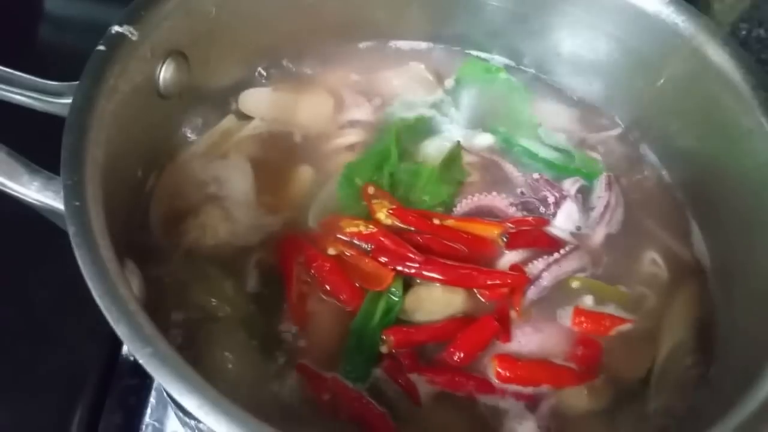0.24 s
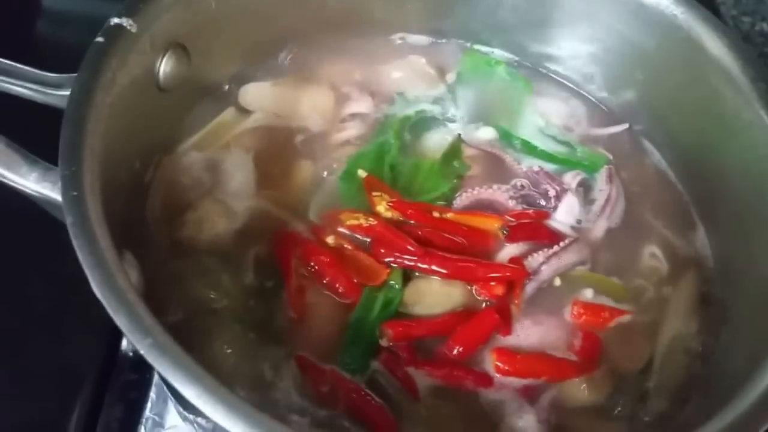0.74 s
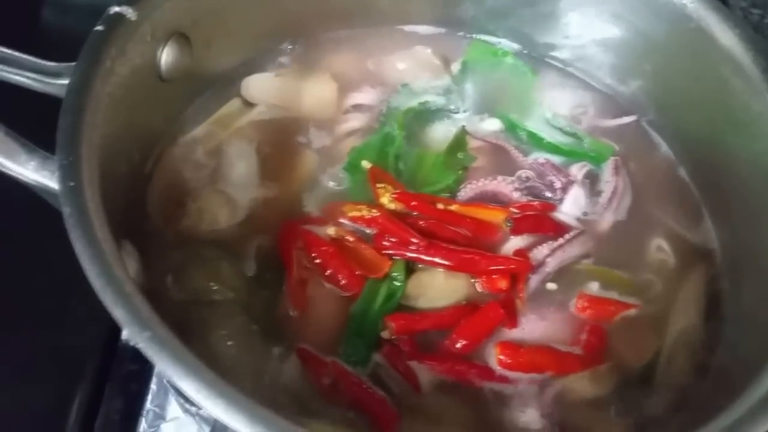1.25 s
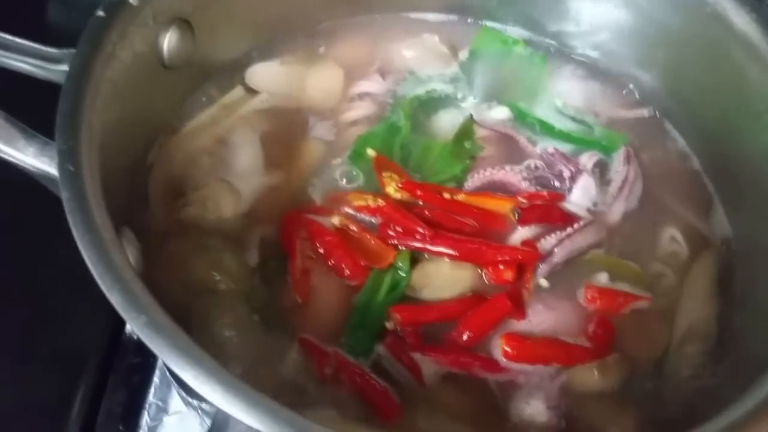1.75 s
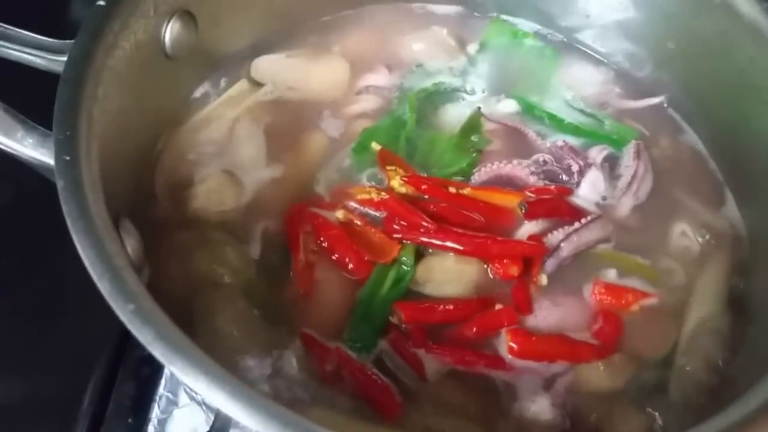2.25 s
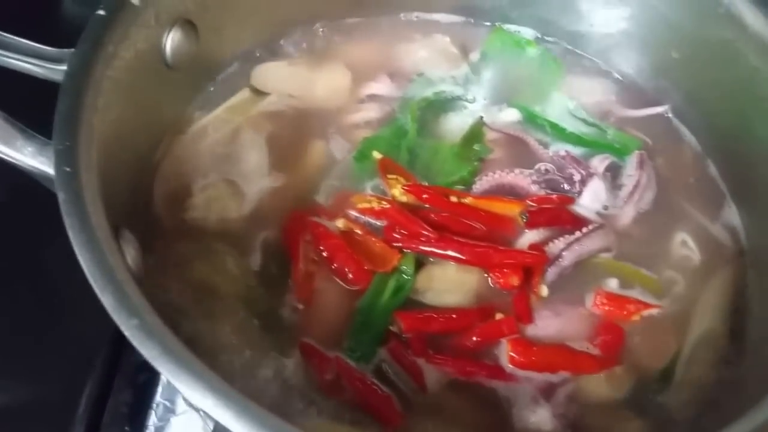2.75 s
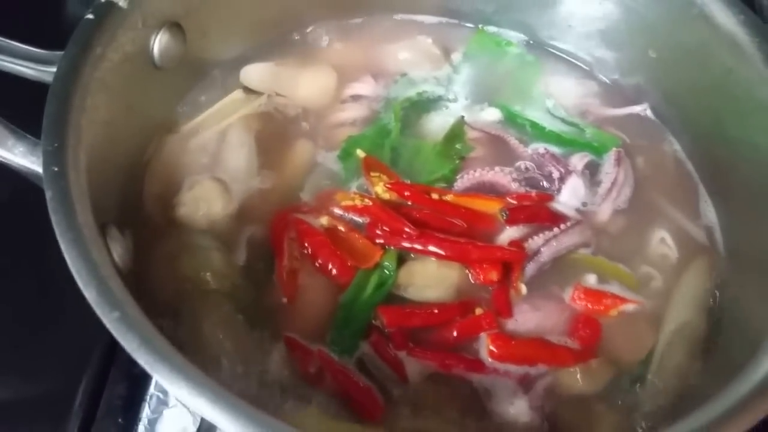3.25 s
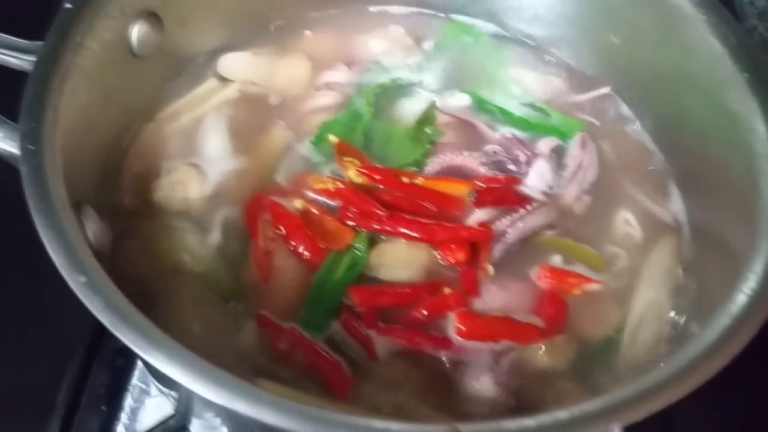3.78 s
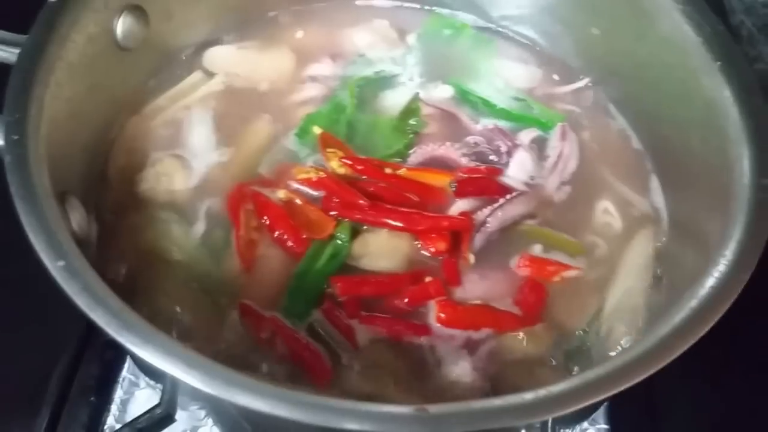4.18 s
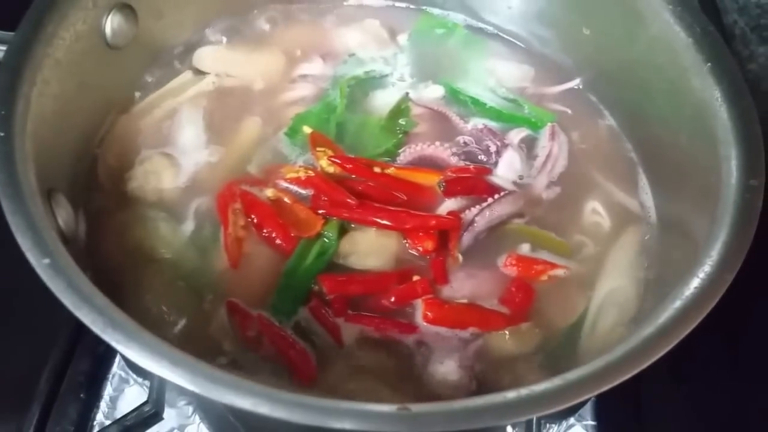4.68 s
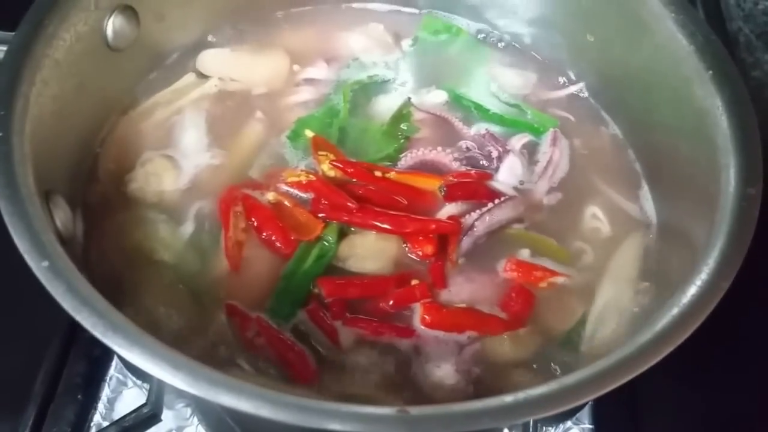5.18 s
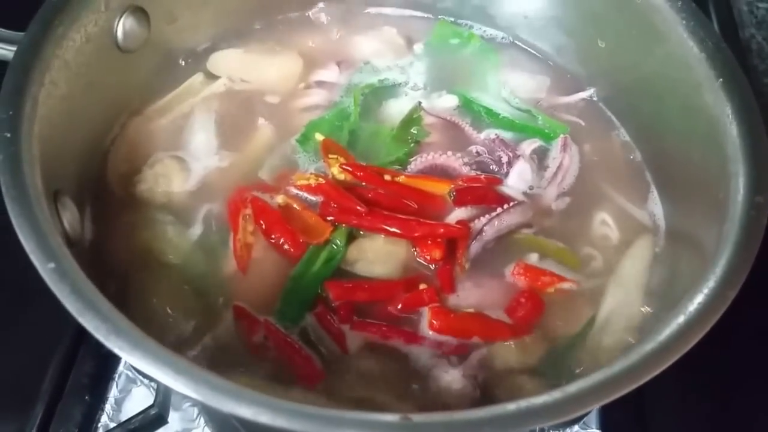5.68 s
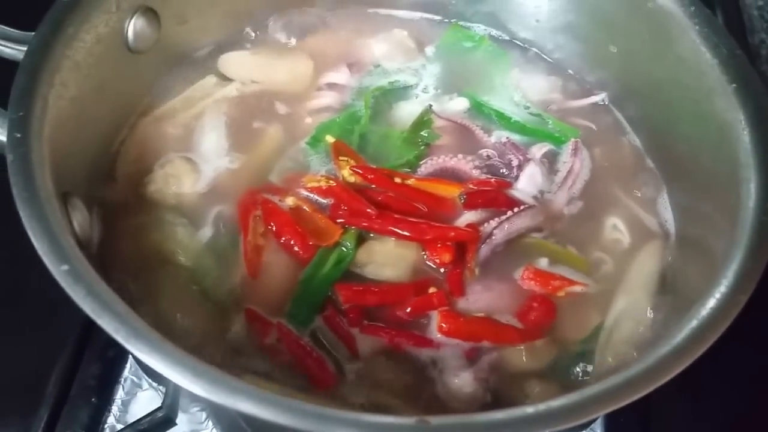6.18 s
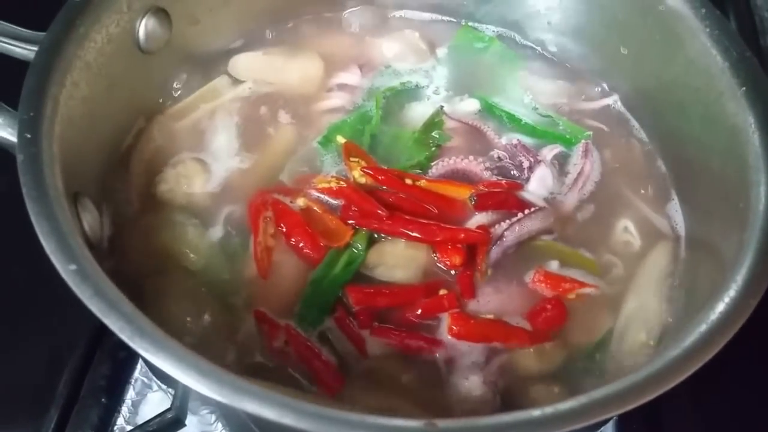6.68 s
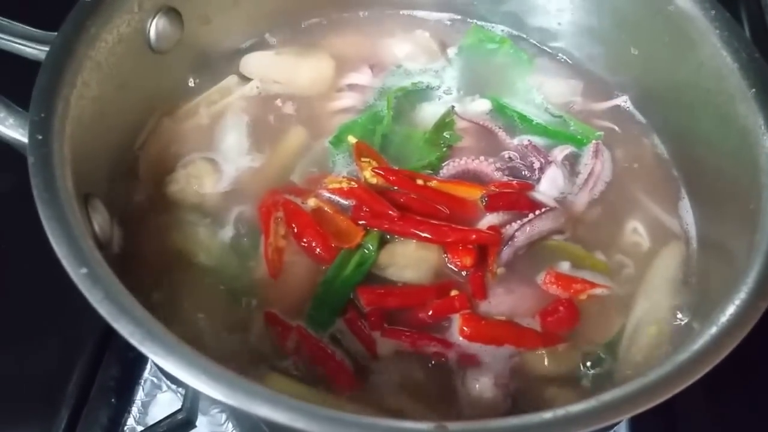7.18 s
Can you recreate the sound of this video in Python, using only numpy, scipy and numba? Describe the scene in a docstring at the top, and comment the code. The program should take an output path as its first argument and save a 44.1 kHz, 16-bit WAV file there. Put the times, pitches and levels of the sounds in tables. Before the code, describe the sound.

A steel pot of broth boils close to a phone, stronger on the left. From 0 to 0.75 s it is fiercest: wet, hollow bubble pops with snapping films, and a flickering hiss swelling near 0.4 s. Tiny tinks come around 0.85 s, then light metal rattles from 0.9 to 1.2 s. The boil thins to scattered plops, crisp spits and low gurgling, with the pot's air ringing. At 2.34 s a cupboard knock booms and overloads the microphone; lesser thumps follow around 2.6 s. At 3.28 s something clacks once, hard and bright, with a short echo. Bubbling continues, with very faint bumps near 3.5, 5.35 and 6.04 s and a short sizzle around 5.3 s. At 6.55 s a moderate knock carries small high rings. Low motor hum beats slowly under soft flame rush throughout, in a small kitchen, until 7.4 s.

```python
"""Boiling broth in a steel pot: bubbles burst as short damped rings and set the air in the pot ringing, and spray
fizzes on the hot wall as flickering noise. A cupboard nearby is knocked a few times and something else clacks
once (ringing modes, bright cracks, clear short rings); something light rattles once (narrow noise and rings).
Behind it two motors hum and beat over a rush of flame and kitchen. A phone is held over the pot, its left
microphone nearer, and the loudest knocks overload it."""
import sys
import numpy as np
from scipy import signal
from scipy.fft import rfft, irfft, next_fast_len
from scipy.io import wavfile
from scipy.ndimage import uniform_filter1d
from numba import njit

SR = 44100
rng = np.random.default_rng(int(sys.argv[2]) if len(sys.argv) > 2 else 0)


def linear_from_db(decibels):
    """Turn decibels (scalar or array-like) into linear amplitude factors; 0 gives 1."""
    return 10 ** (np.asarray(decibels, float) / 20)


def wav_record(signal):
    """Record a signal, one row per channel, as 16-bit PCM in the file named by sys.argv[1]."""
    frames = np.transpose(np.atleast_2d(signal))
    bounded = np.clip(frames, -1, 1)
    # unit amplitude maps onto the largest positive 16-bit level
    quanta = np.round(bounded * 32767).astype(np.int16)
    wavfile.write(sys.argv[1], SR, quanta)


N = 327649
T = np.arange(N) / SR


def along(table, hz):
    """Reads (pitch [Hz], value) rows at any pitch, on a log-frequency axis."""
    rows = np.array(table, float)
    return np.interp(np.log(np.maximum(hz, 1)), np.log(rows[:, 0]), rows[:, 1])


def colour(x, table, share=1):
    """Filters by (pitch [Hz], level [dB]) rows, the levels scaled by share."""
    n = next_fast_len(x.shape[-1], True)
    gain = linear_from_db(share * along(table, np.fft.rfftfreq(n, 1 / SR)))
    return irfft(rfft(x, n) * gain, n)[..., :x.shape[-1]]


def band(x, lo_hz, hi_hz):
    """Keeps the pitches between two limits, using only past sound."""
    sos = signal.butter(2, [lo_hz, min(hi_hz, SR / 2.2)], "band", fs=SR, output="sos")
    return signal.sosfilt(sos, x)


def unit(x):
    """Scales a sound to rms 1."""
    return x / np.sqrt(np.mean(x ** 2))


def pair(size, apart_hz=700):
    """Two noises, left and right, alike in the bass and unrelated in the treble."""
    n = next_fast_len(size, True)
    mid, side = rfft(rng.standard_normal((2, n)))
    alike = 1 / (1 + (np.fft.rfftfreq(n, 1 / SR) / apart_hz) ** 2)
    shared = mid * np.sqrt(1 + alike)
    opposed = np.outer([1, -1], side * np.sqrt(1 - alike))
    return irfft(shared + opposed, n)[:, :size] / 2 ** .5


def walk(rate):
    """Smooth random wandering of rms 1, from about rate new values a second."""
    k = int(SR / rate)
    steps = np.repeat(rng.standard_normal(N // k + 1), k)
    return unit(uniform_filter1d(uniform_filter1d(steps, k), k)[:N])


def add(out, s, x):
    """Mixes x into out from time s [s]."""
    i = int(s * SR)
    out[..., i:i + x.shape[-1]] += x[..., :N - i]


def fall(t60, size=SR // 2):
    """Exponential decay that drops 60 dB in t60 [s]."""
    return np.exp(-np.log(1000) * T[:size] / t60)


@njit
def grains(s, hz, cycles, left, right, glide, n, sr):
    """Short damped rings whose pitch climbs as the cavity closes."""
    out = np.zeros((2, n))
    for k in range(len(s)):
        span, phase = cycles[k] * sr / hz[k], 0.
        for j in range(min(int(4 * span), n - int(s[k] * sr))):
            u = j / span
            phase += 2 * np.pi * hz[k] * (1 + glide * u) / sr
            v = np.sin(phase) * 5.4 * u * np.exp(-2 * u)
            out[0, int(s[k] * sr) + j] += left[k] * v
            out[1, int(s[k] * sr) + j] += right[k] * v
    return out


def in_pot(x, ring_db=-6):
    """The air column over the broth rings on after each burst."""
    # resonances of the air in the pot: (pitch [Hz], width [Hz], level against the others [dB])
    air_rings = [(790, 110, 1), (1635, 242, -4), (2730, 53, 2), (3224, 96, -1), (4140, 130, -2)]
    top = max(db for _, _, db in air_rings)
    rings = (linear_from_db(db - top) * band(x, hz - width / 2, hz + width / 2) for hz, width, db in air_rings)
    return x + linear_from_db(ring_db) * sum(rings)


def bubbles(churn_db, count=3500, spread_db=2.6):
    """Small bubbles ring at random; the listed loud ones also snap their film and splash back in four drops."""
    # loudest bursting bubbles, before the offsets below:
    # (time [s], level [dB], starting pitch [Hz], film snap level [dB], left minus right [dB])
    pops = [(0.008, -27, 760, -35, 13), (0.022, -11, 2030, -18.5, 15.5), (0.024, -26, 1980, -12.5, 7.5),
            (0.063, -24, 4300, -35, 24), (0.151, -30, 840, -50, 9), (0.16, -22, 965, -53, 13),
            (0.178, -24, 1940, -37, 18), (0.269, -15, 2170, -19.5, 8), (0.426, -19.5, 2440, -37, 7),
            (0.474, -20.5, 790, -34, 11), (0.503, -11.5, 1790, -9, 8), (0.599, -35.5, 1620, -59, 39),
            (0.603, -23.5, 880, -57, 4), (0.613, -26, 850, -56, 9), (0.624, -25, 4140, -37, 31.5),
            (0.731, -28.5, 680, -41, 10), (0.743, -30.5, 794, -40, 11), (0.929, -24.5, 1580, -44, 1),
            (1.302, -30.5, 1095, -53, 7), (1.384, -31.5, 1560, -49, 26), (1.487, -39, 3720, -60, 32),
            (1.513, -26, 1740, -51, 1), (1.548, -21.5, 990, -43, 11), (1.632, -23.5, 1710, -54, -2),
            (1.881, -24.5, 1680, -65, -1), (1.944, -35.5, 2510, -53, 16), (2.035, -31, 790, -93, 8),
            (2.172, -25, 765, -49, 7), (2.213, -33.5, 1630, -63, 0), (2.799, -23, 1710, -72, 0),
            (3.715, -27, 1120, -60, 4), (3.757, -30.5, 880, -44, 8), (4.229, -32.5, 870, -44, 15),
            (5.212, -27.5, 990, -55, 11), (5.223, -18.5, 1640, -56, -1), (5.738, -28, 2280, -58, 18),
            (5.936, -24.5, 790, -47, 12), (6.199, -32.5, 1050, -52, 15), (6.227, -29, 1690, -53, 4),
            (6.799, -32, 1680, -65, 0), (7.308, -33.5, 1070, -46, 10)]
    pot_left_db = 7  # taken off left minus right, as the microphones favour the left too
    chance = rng.random((count, 5)).T
    s = chance[0] * (N - 1) / SR
    size = linear_from_db(churn_db[(s * SR).astype(int)] - 8 - spread_db * np.log(1 - chance[1]))
    pan = linear_from_db(10.6 * (chance[4] - .5))
    hz, cycles = 450 * 8.4 ** chance[2], 0.11 + 1.93 * chance[3]
    small = grains(s, hz, cycles, size * pan, size / pan, 0.055, N, 1. * SR)

    s, db, hz, snap_db, pan_db = np.array(pops, float).T
    side = linear_from_db((pan_db - pot_left_db) / 2)
    loud = grains(s - .0007, hz, 2.12 + 0 * s, linear_from_db(db) * side, linear_from_db(db) / side, 0.023, N, 1. * SR)

    later, pitch, share = rng.random((len(s), 4, 3)).T
    drop = (linear_from_db(db + 2) * share).ravel()
    drop_s = (s + 0.0094 * later ** 2).ravel()
    drop_hz = (hz * 3.5 ** (pitch - .3)).ravel()
    loud += grains(drop_s, drop_hz, 0.79 + 0 * drop, drop, drop, 0.14, N, 1. * SR)

    for at, db in zip(s, snap_db):
        snap = band(pair(800), 3700, 11600) + 5.6 * band(pair(800), 7400, 7600)
        add(loud, at, linear_from_db(db + 4.5) * snap * fall(0.017, size=800))
    return in_pot(small + loud)


def fizz(fizz_db, count=70):
    """Spray boils off the hot wall: a flickering hiss, sizzles, short spits each of its own length and brightness."""
    # loudest spits of spray on the hot wall, before the offsets below: (time [s], level [dB])
    spits = [(0.09, -31), (0.215, -30), (0.305, -41), (0.369, -36), (0.386, -34), (0.414, -35),
             (0.621, -38), (0.673, -36), (0.704, -31), (0.89, -46), (1.131, -42), (1.247, -38.5),
             (1.396, -38), (1.499, -42), (1.525, -28.5), (1.616, -36.5), (1.817, -45), (2.121, -44),
             (2.2099, -41), (2.4628, -37.5), (2.6968, -29.5), (2.796, -34.5), (2.919, -37), (3.0104, -39.5),
             (3.0799, -39), (3.172, -33.5), (3.539, -33.5), (3.6343, -30), (3.842, -36.5), (4.035, -46),
             (4.222, -43), (4.279, -34.5), (4.326, -42.5), (4.35, -42), (4.463, -33.5), (4.598, -38.5),
             (4.721, -43), (4.743, -35.5), (4.861, -39), (4.941, -42), (5.006, -37), (5.029, -38.5),
             (5.166, -32.5), (5.277, -45), (5.649, -44), (5.92, -44), (6.0526, -33), (6.326, -41),
             (6.704, -46), (6.904, -38), (7.2235, -37.5), (7.276, -37)]
    # longer sizzles where a splash wets the wall: (time [s], level [dB], length [s])
    sizzles = [(5.325, -39.5, 0.1), (6.61, -41.5, .1), (6.857, -41, .05)]
    # colour of the hiss: (pitch [Hz], level [dB])
    hiss_colour = [(880, -2), (1500, -22), (1690, 8), (1930, -2.5), (3810, 2), (14600, -5.5), (16000, -9),
                   (16500, -47)]
    rise_s, spit_s, length_scatter = 0.0018, 0.012, .6
    tilt_db = 5  # how far a full tilt lifts the duller half and lowers the brighter
    level = linear_from_db(fizz_db + 0.5 * walk(51)) * np.ones((2, 1))  # duller and brighter half

    small = [(s * N / SR, -52 + 9 * size) for s, size in rng.random((count, 2))]
    short = list(spits) + small
    chances = rng.uniform(-1.4, 1, (len(short), 2))
    bursts = [(s, db, spit_s * (1 + length_scatter * longer), tilt)
              for (s, db), (longer, tilt) in zip(short, chances)]
    bursts += [(s, db, length, 1) for s, db, length in sizzles]  # sizzles lean to the duller half

    t = T[:SR // 4]
    for s, db, length, tilt in bursts:
        shape = np.minimum(t / rise_s, 1) * np.exp(-(t / length) ** 3)
        halves_db = tilt_db * tilt * np.array([[1], [-1]])
        add(level, s - .001, linear_from_db(db - 6.0 + halves_db) * shape)

    # tiny ticks, each in one half only
    for s, size, half in rng.random((250, 3)):
        tick_db = fizz_db[int(s * N)] + 4.9 * size
        add(level[int(2 * half)], s * N / SR, linear_from_db(tick_db) * fall(0.0037, size=600))

    droplets = 1 + .5 * rng.exponential(size=N // 40 + 1).repeat(40)[:N]
    hiss = unit(colour(pair(N) * droplets, hiss_colour))
    dull = signal.sosfiltfilt(signal.butter(1, 7000, fs=SR, output="sos"), hiss)
    return level[0] * dull + level[1] * (hiss - dull)


def simmer_and_gurgle(churn_db):
    """Noise ringing in the pot's air and a low gurgle, both swaying by chance and following the boil."""
    simmer = unit(in_pot(band(pair(N), 610, 4400), ring_db=7)) * linear_from_db(churn_db - 15.5 + 2.5 * walk(16))
    gurgle = unit(band(pair(N), 126, 360)) * linear_from_db(churn_db - 8.5 + 3.5 * walk(30))
    return simmer + gurgle


def knocks_and_clack():
    """Each hit rings a set of modes: boom in the lowest, body near its centre pitch, edge above."""
    # knocks on the cupboard, and one clack of something else at 3.283 s, before the offsets below:
    # (time [s], level [dB], centre pitch [Hz], boom level [dB], edge level [dB])
    hits = [(2.285, -24, 366, -47, -26), (2.339, 5, 391.6, 2.5, -5), (2.589, -7.5, 406, -2, -12.5),
            (2.622, -5.5, 306, -20, -14), (2.634, -9.5, 377, -3, -20), (3.283, -10.5, 400, -10.5, -11.5),
            (3.486, -31.5, 320, -24.5, -32.5), (3.539, -30, 390, -24, -50), (5.354, -27.5, 251, -43, -49),
            (6.044, -39, 298, -30.5, -45), (6.55, -11.5, 284, -24, -37), (6.577, -37, 280, -35, -44),
            (6.598, -34, 320, -49, -49)]
    # modes of the cupboard panel, lent to the clack too:
    # (middle pitch [Hz], level [dB], t60 before the limit below [s])
    modes = [(111.9, -2, 0.34), (151.6, -4.5, 0.18), (177.7, -8.5, 0.2), (281.8, -3, 0.45),
             (323.5, -2.5, 0.87), (424.2, -2, .2), (478.4, -11, 0.22), (558, -11.5, 0.12),
             (734, -18.5, 0.42), (1002, -25, 0.15), (1194, -19, 0.39)]
    longest_ring_s, scatter_db = .26, 2
    out, t = np.zeros(N), T[:SR // 2]
    for s, db, centre_hz, boom_db, edge_db in hits:
        for (hz, mode_db, t60), turn in zip(modes, rng.standard_normal((len(modes), 8))):
            if hz < 200:
                hit_db = boom_db - 8.5
            elif hz < 500:  # strongest around the centre pitch
                hit_db = db - 13.5 - 3.0 * np.log2(hz / centre_hz) ** 2
            else:
                hit_db = edge_db - 0.5
            # panels never ring alone: each mode is a cluster of close neighbours that beat
            cluster_hz = hz * (1 + 0.0708 * turn[:7])
            cluster = np.sin(2 * np.pi * np.outer(cluster_hz, t)).sum(axis=0) / 2
            level = linear_from_db(mode_db + hit_db + scatter_db * turn[7])
            add(out, s, level * cluster * fall(min(t60, longest_ring_s)))

        # the thump itself: a few cycles that swell while the push lasts
        push = t / 0.0052
        swell = push * np.exp(.5 - push ** 2 / 2)
        add(out, s, linear_from_db(db + 1.0) * np.sin(2 * np.pi * centre_hz * t) * swell)

        # the edge as noise: low and high limit [Hz], level [dB], t60 [s]
        for lo_hz, hi_hz, noise_db, t60 in ((440, 1165, edge_db - 0.5, 0.11),
                                            (1510, 1810, edge_db - 9.5, 0.073),
                                            (1900, 2300, edge_db - 34.5, 0.12)):
            noise = unit(band(rng.standard_normal(len(t)), lo_hz, hi_hz))
            add(out, s, linear_from_db(noise_db) * fall(t60) * noise)
    return band(out, 98, SR / 2)


def cracks():
    """Hard surfaces meet: a bright burst of noise in each band with a fainter, scattered tail."""
    # cracks, before each band's own level: (time [s], level [dB])
    meetings = [(2.339, -30), (2.623, -49), (3.284, -9), (6.55, -38.5)]
    # the crack, band by band: (low limit [Hz], high limit [Hz], level against the crack [dB], t60 [s],
    # tail level against the burst [dB], tail t60 [s])
    crack_bands = [(1270, 2740, 2, 0.027, -17.5, 0.38), (3700, 6540, 0, 0.055, -11.5, 0.43),
                   (6360, 9600, -0.5, 0.029, -17.5, 0.29), (9900, 13700, -7, 0.039, -15, 0.29)]
    out, t = np.zeros((2, N)), T[:SR // 2]
    for s, db in meetings:
        for lo_hz, hi_hz, band_db, t60, tail_db, tail_t60 in crack_bands:
            noise = unit(band(rng.standard_normal(len(t)), lo_hz, hi_hz))
            burst = np.minimum(t / 0.00035, 1) * fall(t60) * noise
            scattered = unit(band(pair(len(t)), lo_hz, hi_hz))
            tail = linear_from_db(tail_db) * np.minimum(t / 0.0043, 1) * fall(tail_t60) * scattered
            add(out, s, linear_from_db(db + band_db) * (burst + tail))
    return out


def rattle_and_short_rings():
    """Loose light metal scrapes and ticks against itself as narrow noise; clear short rings are decaying tones."""
    # taps of the rattle, before the offsets below:
    # (time [s], level [dB], upper ring pitch [Hz], upper ring level [dB])
    taps = [(0.9351, -29, 3340, -40), (0.9537, -30, 4650, -34), (0.9627, -43, 4080, -44),
            (1.02, -29, 3970, -33), (1.077, -25.5, 4270, -28), (1.0938, -22, 5040, -28.5),
            (1.114, -25, 4600, -32), (1.137, -44, 4800, -23.5), (1.202, -36, 4600, -56)]
    # clear short rings: lone tinks, and the high tones that ring together in the knock at 6.55 s:
    # (time [s], pitch [Hz], level [dB], t60 [s])
    short_rings = [(.848, 6900, -30, .05), (.875, 4140, -35, .03), (3.283, 4700, -9, 0.031),
                   (6.549, 2240, -27.5, 0.12), (6.551, 3770, -26, 0.043), (6.549, 5530, -35, .04),
                   (6.552, 5970, -38.5, .09), (6.705, 3230, -37, 0.033)]
    out, t = np.zeros(N), T[:SR // 2]
    # scrapes of narrow noise: (time [s], pitch [Hz], level [dB], t60 [s])
    scrapes = [(s, 1814, db - 0.5, 0.14) for s, db, _, _ in taps]
    scrapes += [(s, 2800, db - 14.0, .07) for s, db, _, _ in taps]
    for s, hz, db, t60 in scrapes:
        noise = unit(band(rng.standard_normal(len(t)), hz / 1.04, hz * 1.04))
        add(out, s, linear_from_db(db) * noise * fall(t60))
    for s, _, _, db in taps:
        noise = unit(band(rng.standard_normal(len(t)), 4800, 8000))
        add(out, s, linear_from_db(db - 8.5) * noise * fall(0.068))
    upper_rings = [(s, hz, db + 6.0, .03) for s, _, hz, db in taps]
    for s, hz, db, t60 in list(short_rings) + upper_rings:
        add(out, s, linear_from_db(db) * np.sin(2 * np.pi * hz * t) * fall(t60))
    return out


def motors():
    """Two motors hum in steady tones; the two lowest lie close together and beat."""
    # motor tones, before the lift below: (pitch [Hz], level [dB])
    hums = [(54.87, -54), (59.25, -50), (118.45, -54), (236.9, -60), (344.7, -54), (473.8, -64)]
    t = T - 0.062  # counted from a dip of the beat [s], where neighbouring tones oppose
    return sum(linear_from_db(db + 3.5) * np.cos(2 * np.pi * hz * t) * (-1) ** k for k, (hz, db) in enumerate(hums))


def kitchen_rush():
    """The rush of flame and kitchen: coloured noise whose level wanders."""
    # colour of the rush: (pitch [Hz], level [dB])
    rush_colour = [(15, -26), (25, 5.5), (64, 9), (190, -3), (335, 7), (516, -9.5), (775, 0.5),
                   (1330, -9.5), (1610, -5), (2050, -15), (2840, -4), (3520, -24), (4030, -10),
                   (16000, -76)]
    return unit(colour(pair(N), rush_colour)) * linear_from_db(-45.5 + 2.04 * walk(17))


def room(x, wet_db):
    """Dense echo of a small kitchen, each third octave dying at its own pace."""
    # how long the echo lasts: (pitch [Hz], t60 [s])
    echo_times = [(100, 0.22), (400, 0.46), (1500, 0.47), (5000, 0.58), (12000, 0.38)]
    noise = pair(SR // 2, apart_hz=886)
    centres_hz = 70 * 2 ** np.arange(0, 8, 1 / 3)
    echo = sum(band(noise, hz / 1.12, hz * 1.12) * fall(along(echo_times, hz)) for hz in centres_hz)
    echo = echo * np.minimum(T[:SR // 2] / 0.0024, 1) / np.sqrt(np.sum(echo ** 2) / 2)
    return x + linear_from_db(wet_db) * signal.fftconvolve(np.atleast_2d(x), echo, axes=1)[:, :N]


def ports(x, share, lag):
    """The left microphone is louder, mostly in the treble, and hears each place lag samples later (or earlier)."""
    # lean to the left, added on the left and taken off on the right after scaling by share:
    # (pitch [Hz], level [dB])
    lean = [(60, 1), (110, 3.5), (200, 2), (380, 2.5), (700, 4), (1290, 5.5), (2380, 8.5), (4400, 4),
            (8120, 4.5), (15000, 6.5)]
    left = np.roll(colour(x[0], lean, share), lag)
    right = colour(x[1], lean, -share)
    return np.array([left, right])


def scene():
    """The pot is close and nearly dry, the knocks, clack and rattle further off and more to the right."""
    # the boil, fiercest at first, before each sound's own offset:
    # (time [s], fizz level [dB], churn level [dB])
    boil = [(0.0, -42, -28), (0.086, -43.5, -37.5), (0.29, -38, -35), (0.39, -30, -35),
            (0.506, -41.5, -31.5), (0.748, -47, -39), (1.3, -53, -38.5), (2.14, -55, -39.5),
            (2.82, -54.5, -38), (3.74, -54, -38), (4.12, -53.5, -40.5), (4.9, -52, -39.5),
            (5.1, -54.5, -39.5), (5.45, -50.5, -39), (5.76, -52, -42), (6.5, -52, -39.5), (6.75, -50, -38),
            (7.02, -54, -39.5), (7.43, -53.5, -36)]
    s, fizz_db, churn_db = np.transpose(boil)
    fizz_db, churn_db = np.interp(T, s, fizz_db), np.interp(T, s, churn_db)
    near = room(bubbles(churn_db) + fizz(fizz_db), -15.0)
    near = near + simmer_and_gurgle(churn_db) + motors() + kitchen_rush()
    far = room(knocks_and_clack(), -5) + cracks() + room(rattle_and_short_rings(), -14)
    return ports(near, 0.68, lag=-5) + ports(far, 0.35, lag=15)


def low_pass(x):
    """Removes everything above the highest recorded frequency."""
    return signal.sosfilt(signal.butter(12, 17000, fs=SR, output="sos"), x)


def record(dry):
    """Clips at full scale, takes off the deepest bass and cuts the top steeply."""
    clipped = np.clip(dry, -1, 1)
    no_rumble = signal.sosfilt(signal.butter(1, 12, "high", fs=SR, output="sos"), clipped)
    mix = signal.sosfilt(signal.ellip(8, .2, 70, 15900, fs=SR, output="sos"), no_rumble)
    return low_pass(mix)


dry = scene()
out = record(dry)
wav_record(out)
```